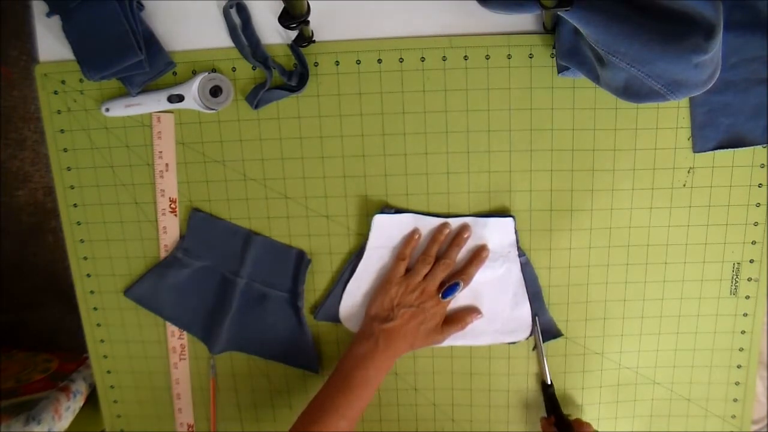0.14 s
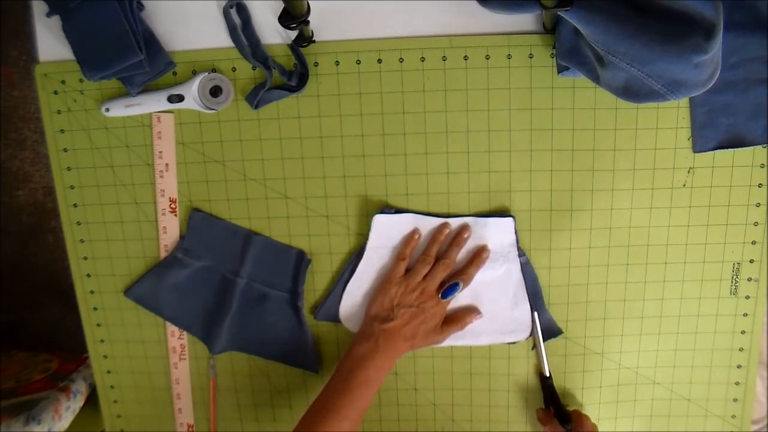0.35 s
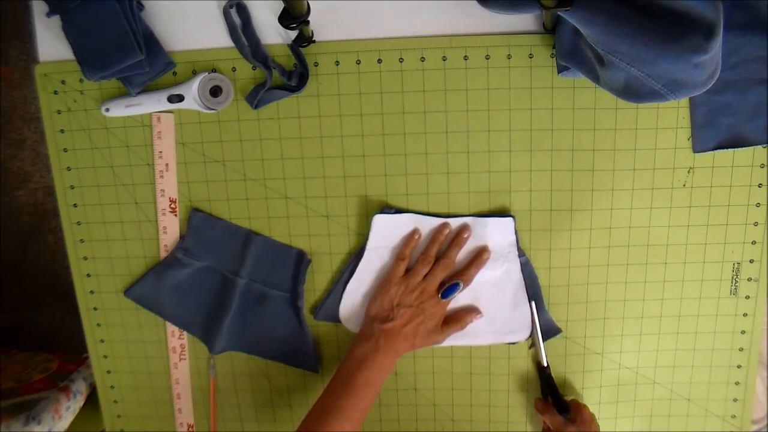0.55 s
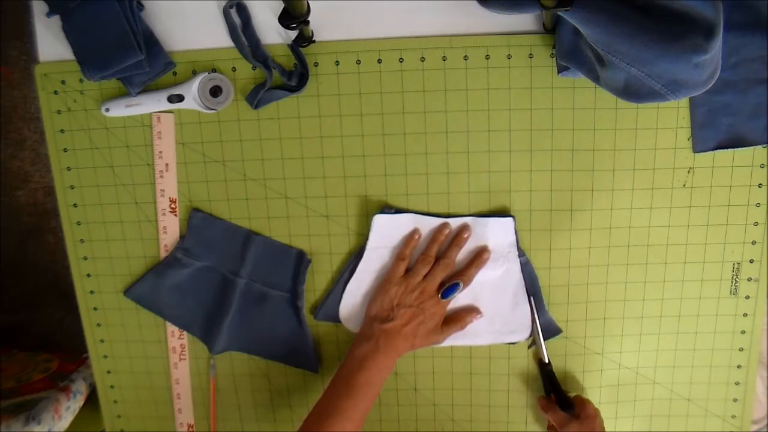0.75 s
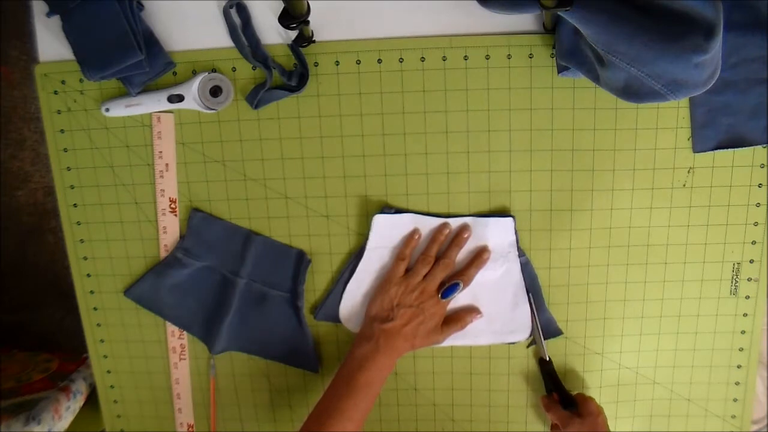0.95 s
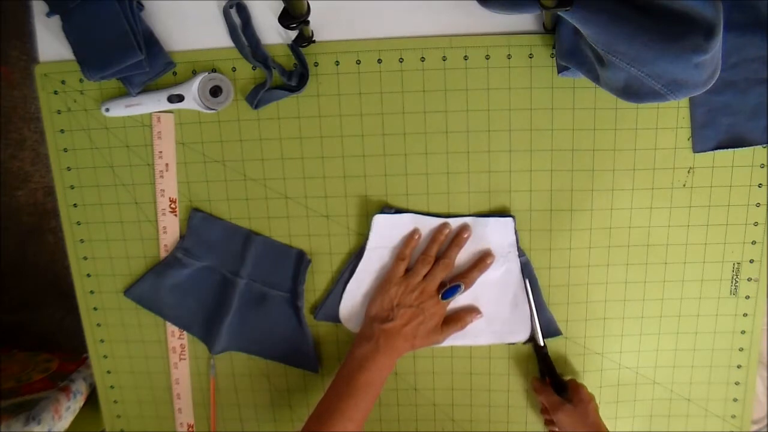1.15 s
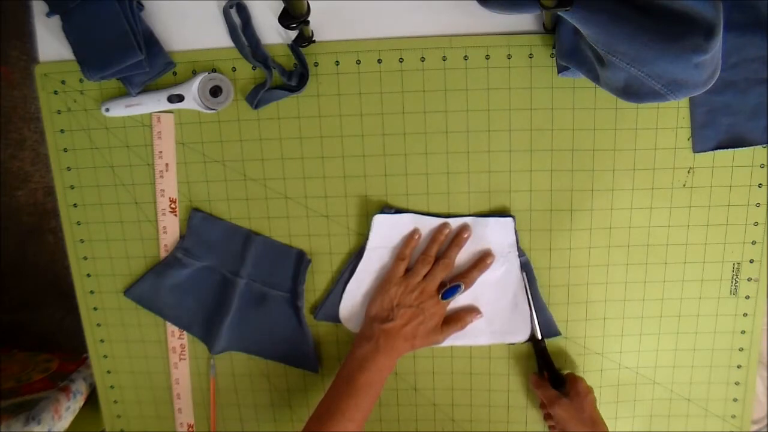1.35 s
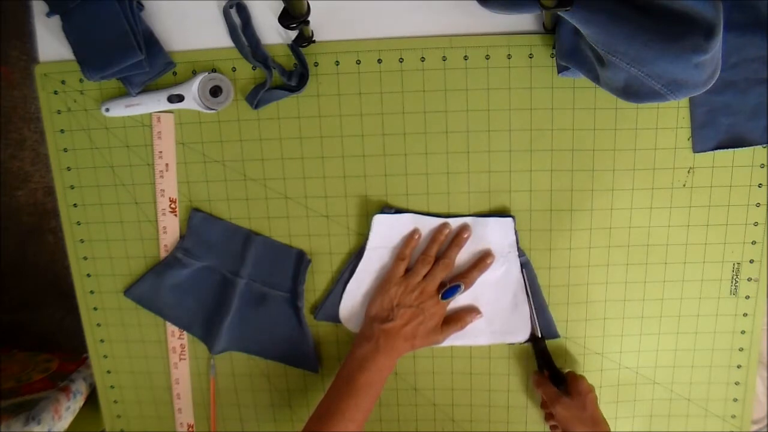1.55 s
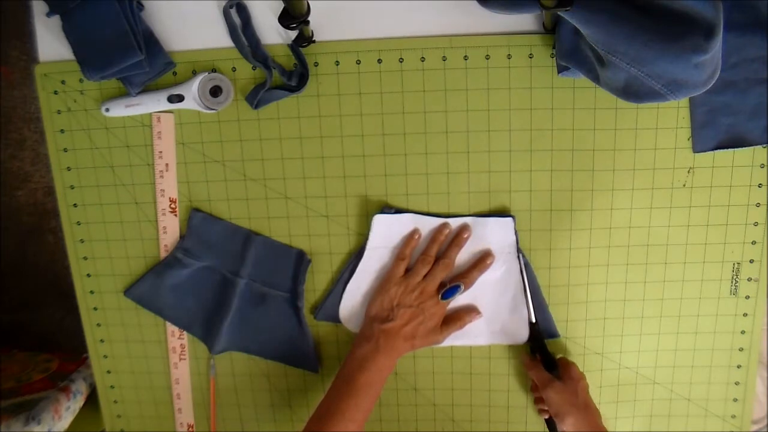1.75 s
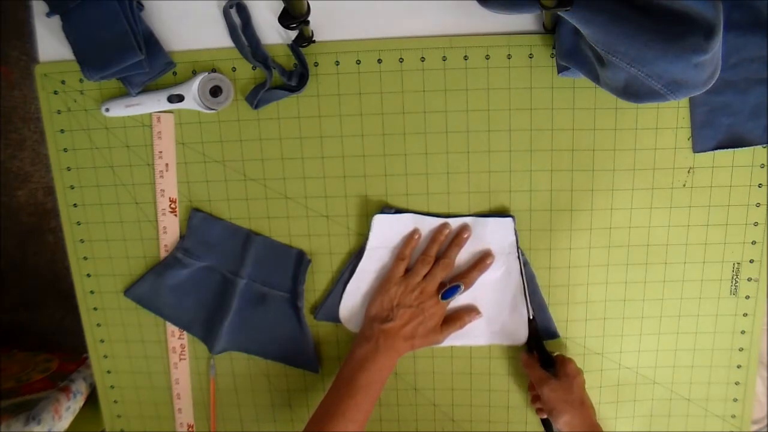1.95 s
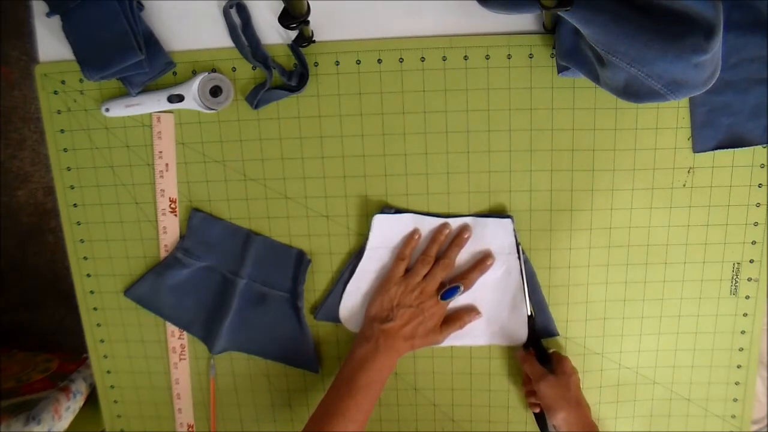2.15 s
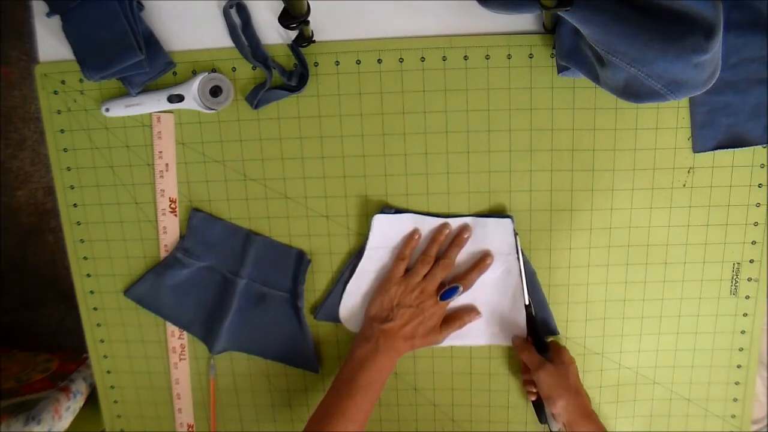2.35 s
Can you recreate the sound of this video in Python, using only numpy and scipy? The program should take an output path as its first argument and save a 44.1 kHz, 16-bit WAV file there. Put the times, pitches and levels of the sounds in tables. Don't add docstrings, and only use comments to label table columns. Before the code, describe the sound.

Large steel shears cut thick cloth on a matted table: the tail of one bite, then four crunching snips with metallic rasp, light knocks and slides between them, close stereo microphone, quiet room with fan hum.

```python
import sys
import numpy as np
from scipy import signal
from scipy.fft import rfft, irfft, next_fast_len
from scipy.io import wavfile
from scipy.ndimage import map_coordinates

SR = 44100
rng = np.random.default_rng(int(sys.argv[2]) if len(sys.argv) > 2 else 0)


def dump_mix(stems):
    frames = np.atleast_2d(stems).T
    limited = np.clip(frames, -1, 1)
    pcm = np.round(limited * 32767).astype(np.int16)
    wavfile.write(sys.argv[1], SR, pcm)


def voltage_ratio(decibels):
    exponent = np.asarray(decibels, float) / 20
    return 10 ** exponent


N = 105266
T = np.arange(N) / SR

# time in seconds, thread force in dB, blade rub in dB.
LAST_OF_EARLIER_BITE = [
    (0, -29.5, -54.5),
    (.008, -45, -50),
    (.07, -61, -81),
]
FIRST_BITE = [
    (.085, -57, -70),
    (0.104, -50, -56.5),
    (0.118, -38.5, -47.5),
    (0.164, -37.5, -49.5),
    (0.174, -33, -46.5),
    (0.189, -41, -52),
    (.26, -67, -68.5),
]
SECOND_BITE = [
    (0.817, -53, -75),
    (.832, -41.5, -53),
    (0.847, -33, -46.5),
    (.9, -29, -47.5),
    (0.942, -37, -44.5),
    (.965, -43.5, -53),
    (1.011, -55, -77),
]
THIRD_BITE = [
    (1.383, -56, -57.5),
    (1.411, -43, -57.5),
    (1.416, -37.5, -47),
    (1.455, -30, -46),
    (1.495, -33.5, -44),
    (1.519, -38, -52),
    (1.54, -28, -43.5),
    (1.56, -40, -41.5),
    (1.62, -64, -77),
]
FOURTH_BITE = [
    (1.95, -62, -65),
    (1.956, -30.5, -46),
    (1.982, -36, -46),
    (1.996, -27, -44.5),
    (2.02, -34, -52),
    (2.029, -37, -48),
    (2.1, -91, -67.5),
]
# time in seconds, position from 0 at the heel to 1 at the tips.
CROSSING = [
    (.5, .6),
    (.86, .1),
    (.92, .7),
    (1.41, .1),
    (1.5, .15),
    (1.53, .9),
    (1.95, .1),
    (2.0, .25),
    (2.04, .7),
]
# until in seconds, then low, middle, inner and upper modes in dB.
TABLE_LOADS = [
    (.08, 1, -9, -1.5, 1.5),
    (.27, 4, -0.5, -0.5, -1.5),
    (.7, -3.5, -0.5, 2.5, -3.5),
    (.96, -2, -1, -2, -1.5),
    (1.04, 4.5, -4, 4.5, -6),
    (1.3, -10, -1.5, -5, -6),
    (1.52, -13.5, -3, -11, 0),
    (1.85, -14.5, -3.5, -5.5, -0.5),
    (3, -8.5, -5, -9.5, -5),
]
# start in seconds, peak in dB, upper over middle modes in dB.
THREAD_SNAPS = [(0.115, -22, 3), (0.12, -34, 11), (0.142, -26, 4), (0.171, -24.5, 10.5), (0.848, -26.5, -4),
                (0.872, -22, -4), (.878, -37, 0), (.9, -28.5, -2), (0.892, -18, -1), (0.92, -20.5, -3),
                (1.387, -39, 17), (1.42, -29, 11), (1.448, -17.5, 4), (1.477, -20, 5), (1.49, -27, 0),
                (1.497, -21.5, -4), (1.54, -17.5, 8), (1.544, -22.5, 6), (1.559, -23, 10),
                (1.956, -25.5, 17), (1.966, -22.5, 2.5), (1.987, -19, -1.5), (2.029, -19.5, 5)]
# start in seconds, peak in dB, upper over middle modes in dB.
KNOCKS = [(.009, -35.5, 6), (.284, -40.5, 2), (.316, -38, 7), (0.37, -41, 0), (.979, -40, -1),
          (1.053, -39, 11), (1.068, -41, -1), (1.094, -40, -2), (1.226, -47, 8), (1.257, -47, 6),
          (1.602, -51, 4), (1.668, -39, -6), (2.211, -48.5, 13), (2.247, -38.5, -11), (2.284, -49, -2),
          (2.33, -47, 6)]
# start in seconds, length in seconds, scrape in dB, upper over middle modes in dB,
# paper rustle in dB.
MAT_SLIDES = [(0.282, 0.069, -52.5, 4, -78), (0.31, 0.17, -51, 0, -71.5), (1.026, 0.054, -49, 4, -85),
              (1.052, 0.07, -46, -9, -69), (1.104, 0.085, -51, -4, -61.5), (1.218, 0.052, -55.5, 3, -64.5),
              (.35, 0.047, -61, 10, -66), (1.634, 0.035, -42.5, -2.5, -72), (1.648, 0.13, -52.5, -4, -68),
              (2.11, .12, -63, 0, -63), (2.196, 0.16, -55, 0, -57.5), (2.308, 0.37, -54, 7, -50)]
# start in seconds, peak in dB, t60 in seconds, pitch in Hz, broad crack in dB.
STEEL_CLICKS = [(0.1734, -33.5, 0.035, 5300, -3.5), (1.5368, -19.5, 0.013, 2410, 1),
                (1.5402, -24.5, 0.013, 3700, 3), (1.9848, -15, 0.012, 2964, -7),
                (1.9848, -15.5, .013, 3800, -10), (1.9892, -25, 0.0074, 3500, -3),
                (1.9945, -31, 0.01, 3900, -1), (2.0235, -31.5, 0.02, 2510, -4),
                (1.5378, -26.5, 0.01, 8300, -5), (1.5375, -24, .012, 5300, -12),
                (.9422, -35, 0.009, 7200, 3), (1.9848, -28.5, 0.011, 9400, -6)]
# start in seconds, length in seconds, pitch in Hz, level in dB.
EDGE_SQUEALS = [(.004, 0.011, 7300, -55), (.104, 0.036, 5180, -50), (.108, 0.018, 7160, -50),
                (0.109, .022, 9870, -55), (.132, 0.029, 5280, -46.5), (.14, 0.014, 8500, -53),
                (0.144, 0.016, 6700, -46), (0.159, .016, 7000, -50), (.166, .011, 8500, -50),
                (.188, 0.023, 5420, -54), (.198, .016, 7100, -57), (0.834, 0.018, 8350, -48.5),
                (.857, 0.023, 8450, -50), (0.858, .012, 11200, -47), (.859, .012, 9900, -48),
                (0.886, .022, 5270, -49), (.909, 0.017, 5400, -42.5), (0.914, 0.012, 8200, -50.5),
                (.936, 0.018, 5330, -41), (0.937, 0.013, 8070, -47), (.94, 0.016, 6600, -47.5),
                (1.415, .02, 8760, -44.5), (1.42, .03, 11800, -52), (1.437, .025, 9070, -47),
                (1.455, 0.025, 11500, -53), (1.462, 0.023, 9500, -54), (1.954, 0.031, 9370, -44),
                (1.966, 0.018, 11600, -54), (1.995, 0.014, 9400, -46), (2.022, .014, 9500, -53),
                (2.028, 0.048, 2500, -54)]

# frequency in Hz, width in Hz, level in dB.
LOW_MODES = [(138, 106, -13), (261, 32.7, 1.5), (317, 38.5, -1.5)]
MIDDLE_MODES = [(553.3, 130, 2.7), (581.4, 73, 0.5)]
INNER_MODES = [(700, 40, 1), (745, 45, -5), (830, 60, -4)]
UPPER_MODES = [(942, 49, -4), (1056, 107, 4.5), (1106, 79, 4), (1168, 230, -5.5), (1301, 41, -4),
               (1484, 118, -2), (1772, 87, -11)]
# frequency in Hz, width in Hz, level in dB.
HEEL_MODES = [(8600, 2400, 1), (11300, 2000, -2.5), (13100, 1300, -12)]
# frequency in Hz, width in Hz, level in dB.
TIP_MODES = [(2500, 400, 1), (3700, 1000, 1), (5300, 1100, -2), (7300, 1400, -1)]

# frequency in Hz, level per Hz in dB.
RUB_SPECTRUM = [(1060, -3.5), (1800, -6), (11500, -22), (13900, -55), (15000, -38)]
# frequency in Hz, level per Hz in dB.
CRACK_SPECTRUM = [(1200, -46), (2500, 1), (4500, 3.5), (9000, -4.5), (15000, -11)]
# frequency in Hz, level per Hz in dB.
RUSTLE_SPECTRUM = [(800, -6), (1300, -5), (3000, -1), (5500, -7.5), (14000, -19.5)]
# frequency in Hz, level per Hz in dB.
ROOM_TONE_SPECTRUM = [(35, -43), (60, -0.5), (122, -7), (165, -14.5), (222, -10), (610, -16), (990, -20),
                      (1800, -27.5), (2340, -62), (3960, -120)]
# frequency in Hz, level per Hz in dB.
HISS_SPECTRUM = [(700, -15), (1300, -7.5), (2650, -5.5), (14500, -11.5)]
# frequency in Hz, correlation from 0 to 1.
LIKENESS = [(60, 0.77), (240, 0.84), (930, 0.66), (3680, 0.084), (14500, 0.057)]
# frequency in Hz, t60 in seconds.
ROOM_T60 = [(200, 0.23), (1500, 0.24), (10000, 0.23)]
# frequency in Hz, side over mid in dB.
PORT_DIFFERENCE = [(1500, -33), (4500, -6.5), (14000, -4.5)]


def hand():
    force, rub = np.zeros((2, N))
    for bite in [LAST_OF_EARLIER_BITE, FIRST_BITE, SECOND_BITE, THIRD_BITE, FOURTH_BITE]:
        s, force_db, rub_db = np.transpose(bite)
        force += voltage_ratio(np.interp(T, s, force_db, -200, -200))
        rub += voltage_ratio(np.interp(T, s, rub_db, -200, -200))
    return force, rub, np.interp(T, *np.transpose(CROSSING))


def table_top(force):
    def push(tilt):
        tear = voltage_ratio(-2) * force * grains(2500, 2.5)
        scrape = sliding(column=2, tilt=tilt) * grains(6000, 2.5)
        return tear + scrape

    low, middle, upper = push(-0.5), push(-0.5), push(0.5)
    t = np.arange(SR // 100) / SR
    for s, db, upper_db in THREAD_SNAPS + KNOCKS:
        snap = voltage_ratio(db + 5 - 60 * t / 0.00073)
        now = slice(round(s * SR), round(s * SR) + len(t))
        low[now] += snap * voltage_ratio(-4)
        middle[now] -= snap * voltage_ratio(-upper_db / 2)
        upper[now] += snap * voltage_ratio(upper_db / 2)

    until, *load_db = np.transpose(TABLE_LOADS)
    row = np.minimum(np.searchsorted(until, T), len(until) - 1)
    low_load, middle_load, inner_load, upper_load = voltage_ratio(np.array(load_db)[:, row])
    out = voltage_ratio(-10) * rung(low_load * low, LOW_MODES, order=2)
    out += voltage_ratio(-6.5) * rung(middle_load * middle, MIDDLE_MODES, order=2)
    out += voltage_ratio(-9) * rung(inner_load * middle, INNER_MODES, order=2)
    return out + voltage_ratio(-6) * rung(upper_load * upper, UPPER_MODES, order=2)


def sliding(column, tilt=0):
    out = np.zeros(N)
    for row in MAT_SLIDES:
        u = np.clip((T - row[0]) / row[1], 0, 1)
        out += voltage_ratio(row[column] + tilt * row[3]) * np.sin(np.pi * u ** 0.71)
    return out


def blade_rub(rub, crossing):
    rasp = rub * grains(15000, 1.5)
    sing = singing(rasp * np.cos(crossing * np.pi / 2), HEEL_MODES)
    sing += singing(rasp * np.sin(crossing * np.pi / 2), TIP_MODES)
    rough = rub * voltage_ratio(2.5 * wobble(200)) * rng.standard_normal(N)
    return voltage_ratio(1) * coloured(rough, RUB_SPECTRUM) + voltage_ratio(-9) * sing


def singing(rasp, modes):
    out = np.zeros(N)
    for hz, width, db in modes:
        catch = voltage_ratio(5 * wobble(70))
        out += voltage_ratio(db) * rung(rasp * catch, [(hz, width, 0)])
    return out


def squeals():
    out = np.zeros(N + SR)
    t = np.arange(SR // 10) / SR
    for s, length, hz, db in EDGE_SQUEALS:
        chance = rng.standard_normal((2, len(t)))
        keep = np.exp(-np.pi * 0.082 * hz / SR)
        arch = np.sin(np.pi * np.clip(t / length, 0, 1)) ** 0.5
        grip = signal.lfilter([1], np.poly([keep, keep]), arch * (chance[0] + 1j * chance[1]))
        grip /= np.sqrt(np.sum(abs(grip) ** 2) / (length * SR))
        out[round(s * SR):][:len(t)] += voltage_ratio(db) * np.real(grip * np.exp(2j * np.pi * hz * t))
    return out[:N]


def clicks():
    cracks, pings = np.zeros((2, N))
    t = np.arange(SR // 20) / SR
    for s, db, t60, hz, crack_db in STEEL_CLICKS:
        fall = voltage_ratio(db - 4.5 - 60 * t / t60)
        now = slice(round(s * SR), round(s * SR) + len(t))
        cracks[now] += fall * voltage_ratio(crack_db) * rng.standard_normal(len(t))
        drift = np.cumsum(rng.normal(0, 0.13, len(t)))
        onset = 1 - np.exp(-t / 0.00025)
        pings[now] += fall * onset * np.sin(2 * np.pi * hz * t + drift)
    return voltage_ratio(-1) * coloured(cracks, CRACK_SPECTRUM) + voltage_ratio(3) * pings


def paper():
    return coloured(sliding(column=4) * grains(9000, 2.5), RUSTLE_SPECTRUM)


def ports(x):
    side = filtered(x * wobble(150), lambda hz: 1j * voltage_ratio(along(PORT_DIFFERENCE, hz)))
    return np.array([x + side, x - side])


def room(x):
    hz, t, z = signal.stft(rng.standard_normal((2, SR // 2)), SR, nperseg=256)
    decay = voltage_ratio(-60 * t / along(ROOM_T60, hz)[:, None])
    tail = signal.istft(z * decay, SR, nperseg=256)[1]
    tail /= np.linalg.norm(tail[0])
    late = np.pad(x, (200, 0))[None]
    return signal.fftconvolve(late, tail, axes=1)[:, :N]


def fan():
    beat_hz, whine_hz = 30.5, 980
    count = int(N / SR * 40)
    chance = rng.standard_normal((count, 2))
    times = (np.arange(count) + 0.16 * chance[:, 0]) / beat_hz
    places = np.clip(times * SR, 0, N).astype(int)
    beats = np.bincount(places, voltage_ratio(2.4 * chance[:, 1]), N + 1)[:N]
    thuds = filtered(beats, lambda hz: -np.exp(-(2 * np.pi * hz * 0.0037) ** 2 / 2) * np.clip(hz / 65, 0, 1) ** 3)

    hum_level = voltage_ratio(-53.5 + 1.7 * wobble(15))
    sides = 0.24 * wobble(6.6) * np.array([[1], [-1]])
    hum = hum_level * np.sin(2 * np.pi * beat_hz * T + 3.84 + 0.5 * wobble(14) + sides)
    whine_level = voltage_ratio(-65 + 1.8 * wobble(7))
    whine = whine_level * np.sin(2 * np.pi * whine_hz * T + 1.04 * wobble(28))
    return hum + voltage_ratio(-62) * unit(thuds) + whine


def noise_floor():
    return voltage_ratio(-54) * pair(ROOM_TONE_SPECTRUM) + voltage_ratio(-59) * pair(HISS_SPECTRUM)


def pair(spectrum):
    def shares(hz):
        turn = np.arccos(np.clip(along(LIKENESS, hz), -1, 1)) / 2
        return voltage_ratio(along(spectrum, hz)) * np.array([np.cos(turn), np.sin(turn)])

    mid, side = filtered(rng.standard_normal((2, N)), shares)
    return unit(np.array([mid + side, mid - side]))


def grains(per_second, spread_db):
    chance, sign, size = rng.random((3, N))
    ticks = (chance < per_second / SR) * np.sign(sign - 0.5)
    return unit(ticks * voltage_ratio(-spread_db * np.log(1 - size)))


def wobble(rate):
    return map_coordinates(rng.standard_normal(1000), [np.arange(N) * rate / SR])


def rung(x, modes, order=1):
    def body(f):
        return sum(voltage_ratio(db) * (1j * f * w / (c * c - f * f + 1j * f * w)) ** order for c, w, db in modes)

    power = np.mean(abs(body(np.linspace(0, SR / 2, 8192))) ** 2)
    return filtered(x, body) / np.sqrt(power)


def coloured(x, spectrum):
    power = np.mean(voltage_ratio(2 * along(spectrum, np.linspace(0, SR / 2, 4096))))
    return filtered(x, lambda hz: voltage_ratio(along(spectrum, hz))) / np.sqrt(power)


def filtered(x, response):
    m = next_fast_len(N + SR // 2)
    return irfft(rfft(x, m) * response(np.fft.rfftfreq(m, 1 / SR)), m)[..., :N]


def along(points, hz):
    f, v = np.transpose(points)
    return np.interp(np.log(hz + 1), np.log(f + 1), v)


def unit(x):
    return x / np.sqrt(np.mean(x ** 2) + 1e-20)


def scene():
    force, rub, crossing = hand()
    cut = table_top(force) + blade_rub(rub, crossing) + squeals() + clicks() + paper()
    tail = room(cut)
    wet = ports(tail[0]) + voltage_ratio(-16.5) * (tail[1] * np.array([[1], [-1]]))
    return ports(cut) + voltage_ratio(-10) * wet + fan() + noise_floor()


def band_limit(x):
    return signal.sosfilt(signal.butter(12, 15110, fs=SR, output="sos"), x)


def record(dry):
    mix = filtered(dry, lambda hz: np.clip((14400 + 300 - hz) / 600, 0, 1) ** 3)
    return band_limit(mix)


dry = scene()
out = record(dry)
dump_mix(out)
```